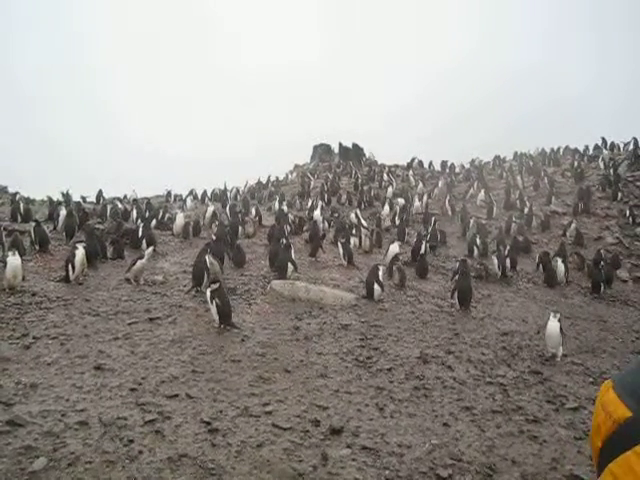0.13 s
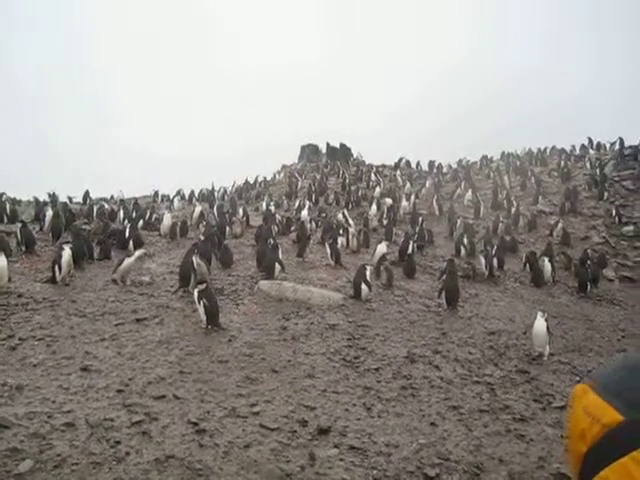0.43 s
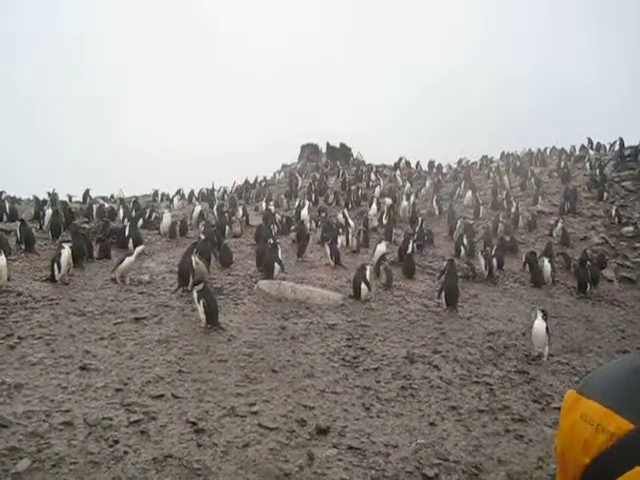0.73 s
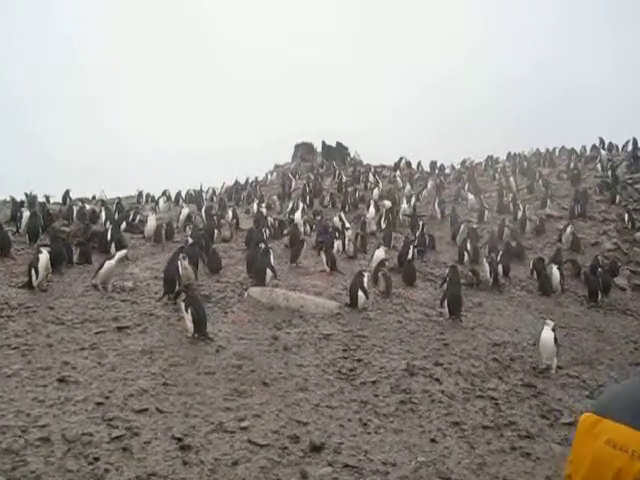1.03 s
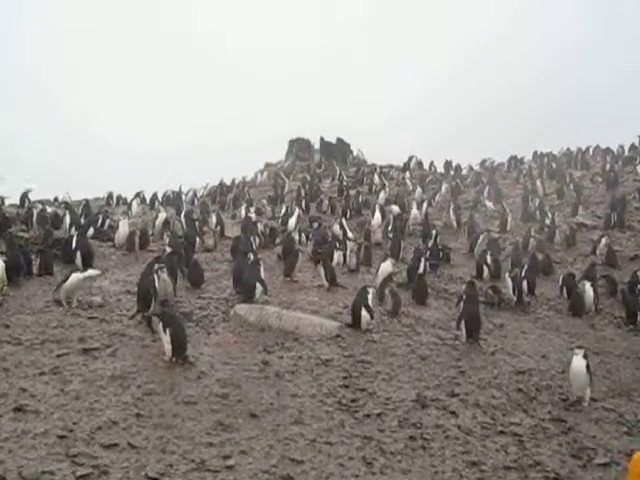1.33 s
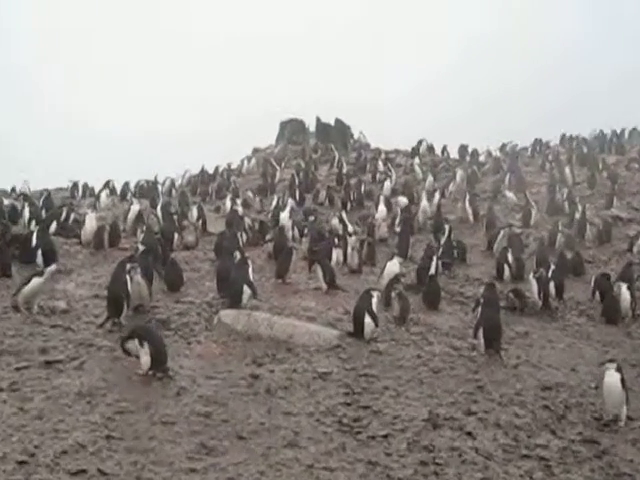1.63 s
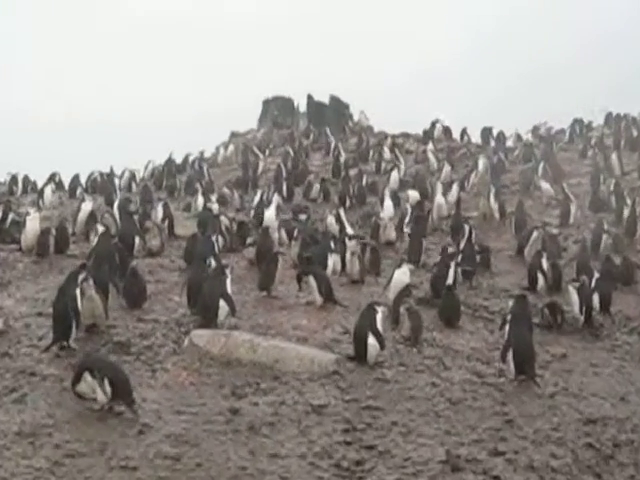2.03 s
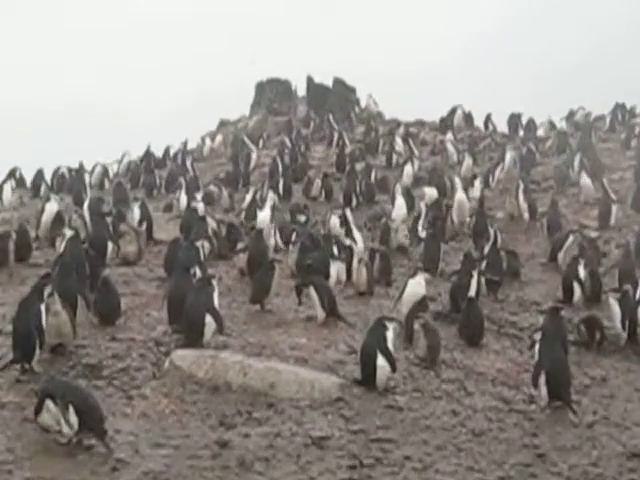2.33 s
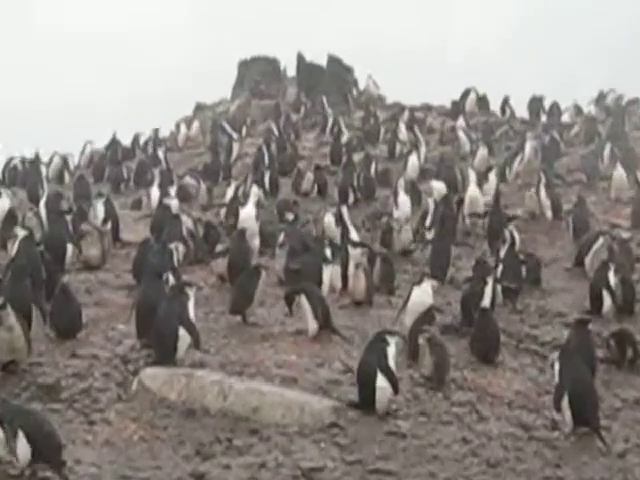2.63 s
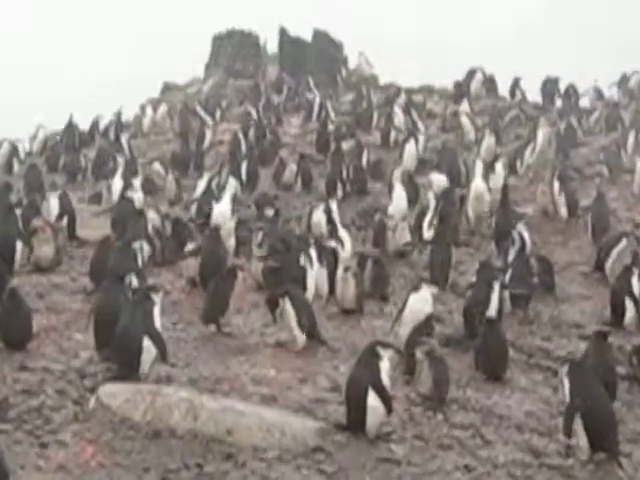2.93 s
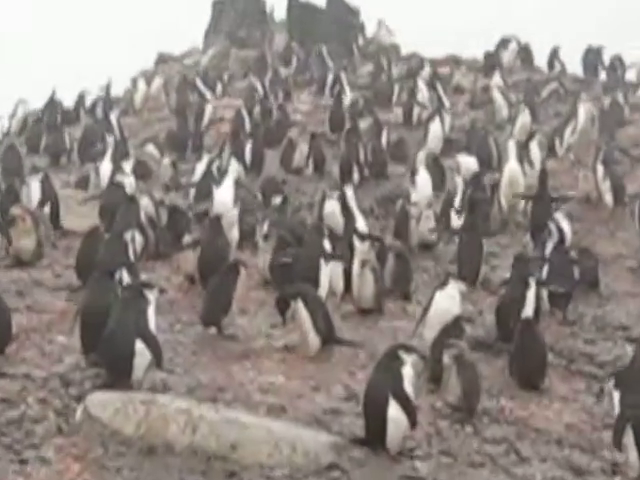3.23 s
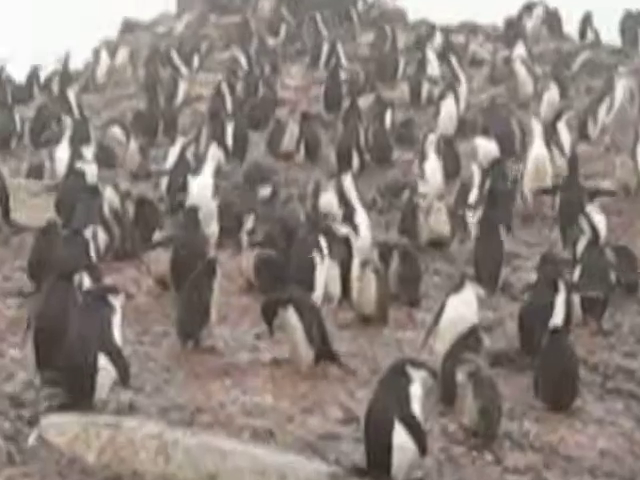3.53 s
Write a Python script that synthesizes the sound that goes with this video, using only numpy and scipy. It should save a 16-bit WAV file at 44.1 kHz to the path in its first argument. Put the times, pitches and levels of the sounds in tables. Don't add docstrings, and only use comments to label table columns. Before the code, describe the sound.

Crowded penguin colony on an open hillside: overlapping raspy barks, rhythmic nasal brays and a few chick peeps above a far din, with lumpy wind rumble strong at first and weaker later.

```python
import sys
import numpy as np
from scipy import signal
from scipy.fft import irfft
from scipy.io import wavfile
from scipy.ndimage import uniform_filter1d

SR = 44100
rng = np.random.default_rng(int(sys.argv[2]) if len(sys.argv) > 2 else 0)


def ratio(d):
    e = np.asarray(d, float) / 20
    return 10 ** e


def generate_wav(signal):
    frames = np.transpose(np.atleast_2d(signal))
    scaled = np.clip(frames, -1, 1) * 32767
    pcm = np.round(scaled).astype(np.int16)
    wavfile.write(sys.argv[1], SR, pcm)


N = 162729


def evened(x):
    return x / np.sqrt(np.mean(x ** 2) + 1e-20)


def add(mix, s, sound):
    at = round(s * SR)
    sound = sound[max(-at, 0):]
    part = mix[max(at, 0):][:len(sound)]
    part += sound[:len(part)]


def curve(points):
    return np.interp(np.arange(N) / SR, *np.transpose(points))


def smooth_wander(shape, size):
    return evened(uniform_filter1d(uniform_filter1d(rng.standard_normal(shape), size=size), size=size))


def colour(x, points):
    hz = np.fft.rfftfreq(4096, 1 / SR) + 1
    f, db = np.transpose(points)
    octaves_below = np.maximum(np.log2(f[0] / hz), 0)
    gain = ratio(np.interp(np.log(hz), np.log(f), db) - 18 * octaves_below)
    taps = np.roll(irfft(gain), 2048) * np.hanning(4096)
    return signal.oaconvolve(x, taps / np.linalg.norm(taps), "same")


def band(x, order, low_hz, high_hz):
    return signal.sosfilt(signal.butter(order, [low_hz, high_hz], "band", fs=SR, output="sos"), x)


def tail(t60):
    taps = np.zeros(SR // 2)
    at = np.arange(150, SR // 2 - 30, 22)
    sign = rng.choice([-1., 1.], len(at))
    taps[at + rng.integers(0, 22, len(at))] = sign * ratio(-60 * at / SR / t60)
    return taps / np.linalg.norm(taps)


def patchy(x):
    z = signal.stft(x, nperseg=512)[2]
    field = uniform_filter1d(rng.standard_normal(z.shape), size=14, axis=0)
    field = evened(uniform_filter1d(field, size=7, axis=1))
    return signal.istft(z * ratio(2.6 * field), nperseg=512)[1][:N]


RISE_S, FALL_S, FADE_DB = 0.022, 0.018, -1


def shape(length, rise=RISE_S):
    t = np.arange(0, length + FALL_S, 1 / SR)
    release = np.clip((length + FALL_S - t) / (2 * FALL_S), 0, 1)
    ramp = np.minimum(t / rise, 1) * release
    return t, np.sin(np.pi / 2 * ramp) ** 2 * ratio(FADE_DB * t / length)


JITTER = 0.07


def syllable(length, db, hz, glide, rough, ring=0., order=4, rise=RISE_S):
    t, env = shape(length, rise)
    noise = np.random.default_rng(rng.integers(1 << 30)).standard_normal((2, len(t)))
    f = hz * (1 + glide * t) * (1 + JITTER * rough * evened(uniform_filter1d(noise[0], size=200)))
    turns = np.cumsum(f) / SR + rng.random()
    top = int(15000 / hz) + .5
    pulses = evened(np.sin(2 * np.pi * top * turns) / (np.sin(np.pi * turns) + 1e-9) - 1)
    phase = 2 * np.pi * order * turns
    ringing = 2 * np.cos(phase) + .6 * np.cos(2 * phase)
    unsteady = 1 + rough * evened(uniform_filter1d(noise[1], size=120))
    pulses = pulses + ring * np.sqrt(hz / 15000) * ringing * unsteady
    puffs = (0.067 + np.exp(-(turns % 1) / 0.24)) * noise[1]
    return ratio(db) * env * evened((1 - rough) * pulses + rough * evened(puffs))


# (f/Hz, level/dB)
AIR = [(3000, -11), (5500, -3.5), (6900, -10.5), (9000, -8), (11000, -22.5), (14500, -28), (15700, -38)]


def air():
    flicker_db = 2.5 * smooth_wander(N, 1500)
    return ratio(-57 + flicker_db) * patchy(colour(rng.standard_normal(N), AIR))


# (t/s, level/dB)
GUST = [(0, -28.5), (.3, -29.5), (.42, -21.5), (.6, -21.5), (.95, -22.5), (1.12, -23.5), (1.45, -30),
        (1.65, -32.5), (1.88, -18.5), (2.0, -27), (2.12, -32.5), (2.26, -45), (2.36, -33.5), (2.6, -34),
        (2.75, -43.5), (3.05, -38), (3.22, -39.5), (3.69, -39)]
# (f/Hz, level/dB)
RUMBLE = [(8.8, -48), (15, 6), (55, 0), (170, -0.5), (375, -9.5), (510, -16.5), (1060, -30), (1600, -48),
          (3300, -100)]


def gusts():
    lump_db, lumps_per_s, flicker_db, calm_db = 3, 320, 3.5, -2
    size = ratio(lump_db * np.minimum(rng.exponential(1, N), 5))
    lumps = size * (rng.random(N) < lumps_per_s / SR) * rng.choice([-1., 1.], N)
    flicker = smooth_wander(N, 900)
    rumble = evened(colour(evened(lumps) + 1.1 * rng.standard_normal(N), RUMBLE))
    return ratio(curve(GUST) + calm_db + flicker_db * flicker) * rumble


# (t/s, peak level/dB, f/Hz)
BUFFETS = [(0.018, -17.5, 169), (0.212, -9, 96), (0.246, -10, 165), (.385, -15.5, 176), (0.55, -11.5, 135),
           (0.656, -15.5, 200), (.85, -38, 70), (.872, -22, 80), (.925, -16, 120), (0.986, -13, 90),
           (1.545, -22.5, 59.5), (1.626, -23, 70), (2.02, -14, 260), (2.31, -26, 85.4), (2.599, -25, 50.4),
           (2.729, -33.5, 49), (0.705, -8.5, 121), (0.728, -11.5, 338), (0.779, -11.5, 97),
           (1.006, -7.5, 145), (1.065, -13, 270), (1.217, -4.5, 99), (1.239, -7, 171), (1.261, -13, 250),
           (1.324, -8, 475), (1.75, -10.5, 83), (1.811, -9.5, 119), (1.828, -5, 69.6), (2.011, -7.5, 97),
           (2.196, -24.5, 92), (2.478, -21, 133), (2.661, -16.5, 110), (2.797, -18.5, 58),
           (2.904, -17, 187), (3.093, -12.5, 220), (3.328, -24.5, 131), (3.435, -27, 141)]


def buffets():
    cycles, puff_db, puff_s = 1.37, -11.5, 0.0058
    out, t = np.zeros(N), np.arange(2600) / SR
    puff = colour(rng.standard_normal(N) ** 3, [(150, 3), (330, -0.5), (900, -13.5), (3000, -61)])
    puff = evened(puff)
    puff_env = ratio(puff_db) * t / puff_s * np.exp(1 - t / puff_s)
    for (s, db, hz), side in zip(BUFFETS, rng.choice([-1., 1.], 60)):
        window = np.sin(np.pi * np.minimum(t * hz / cycles, 1)) ** 2
        swing = side * np.sin(2 * np.pi * hz * t) * window
        add(out, s - .003, ratio(db) * (swing + puff[round(s * SR):][:2600] * puff_env))
    return out


SAG_PER_S, CLIMB_PER_S = -2.3, 3.2
# (f/Hz, level/dB)
DIN = [(350, -66), (700, -11), (1200, -9.5), (1650, 2.5), (2200, -1.5), (5300, -17), (7200, -39),
       (15600, -72)]
# (t/s, level/dB)
DIN_LEVEL = [(0, -26), (.3, -31), (.5, -31), (.8, -34.5), (1.15, -31.5), (1.5, -31), (1.7, -36), (1.9, -31),
             (2.1, -36), (2.4, -32), (2.7, -30.5), (3.0, -29.5), (3.4, -31.5), (3.69, -25)]


def din():
    calls, spread_db, rough, ring = 230, 3.5, .1, .5
    out = np.zeros(N)
    for k, (a, b, c, d, e) in enumerate(rng.random((calls, 5))):
        glide = (SAG_PER_S if d > .4 else CLIMB_PER_S) * (.7 + .7 * e)
        db = -spread_db * np.log(e * 0.74 + 0.13)
        sound = syllable(0.056 + .05 * b, db, 380 + 300 * c, glide, rough, ring, order=3 + k % 3)
        add(out, (k + a) * N / SR / calls - .03, sound)
    far = out + .6 * signal.oaconvolve(out, tail(0.3))[:N]
    return ratio(curve(DIN_LEVEL)) * evened(colour(far, DIN))


# (t/s, peak level/dB, f/Hz)
TICKS = [
    (.9206, -23, 4200),
    (1.068, -44, 11000),
    (1.168, -41, 13000),
    (1.257, -43, 10000),
    (2.9058, -39, 10000),
]


def ticks():
    out, t = np.zeros(N), np.arange(300) / SR
    for s, db, hz in TICKS:
        ringing = np.sin(2 * np.pi * hz * t) + 0.16 * rng.standard_normal(300)
        add(out, s, ratio(db - 60 * t / 0.0046) * ringing)
    return out


# (t/s, length/s, level/dB, first f/Hz, last f/Hz)
CRIES = [(.17, .06, -36, 1350, 1750), (.235, .035, -35, 1750, 1300), (.385, .045, -36, 2800, 2800),
         (.61, .05, -36, 4100, 3400), (.615, .04, -39, 5200, 4300), (.8, .03, -35, 1350, 1600),
         (.858, .025, -32, 1560, 1400), (.868, .015, -33, 2750, 2720), (.9, .02, -34, 1620, 1520),
         (.96, .03, -33, 1680, 1620), (1.085, .05, -34, 1780, 1600), (1.16, .055, -31, 1790, 2200),
         (1.222, .055, -30, 1900, 1550), (1.222, .03, -33, 2350, 2150), (2.69, .02, -33, 2350, 2400),
         (2.74, .05, -35, 3420, 3150), (2.8, .07, -35, 1920, 1800), (2.886, .018, -26, 1750, 1650),
         (2.89, .05, -32, 2150, 1900), (2.91, .045, -32, 2420, 2330), (3.125, .02, -32, 1620, 1560),
         (3.165, .02, -33, 1720, 1640), (3.19, .055, -30, 2200, 2350), (3.25, .045, -32, 1800, 1650),
         (3.47, .05, -33, 2850, 2550), (3.525, .04, -33, 1800, 1620), (3.57, .05, -34, 1400, 1500),
         (3.67, .03, -30, 1950, 1980)]


def cries():
    rise_s, ring, rough, extra_db = .006, 4, .2, 2.5
    out = np.zeros(N)
    for s, length, db, hz, end_hz in CRIES:
        glide = (end_hz / hz - 1) / length
        sound = syllable(length, db + extra_db, hz / 4, glide, rough, ring, rise=rise_s)
        add(out, s - rise_s / 2, sound)
    return band(out, 2, 900, 5000)


# (t/s, length/s, level/dB, first f/Hz, last f/Hz)
COOS = [
    (3.405, 0.075, -37.5, 670, 707),
    (3.62, 0.085, -44, 748, 610),
]


def coos():
    out = np.zeros(N)
    for s, length, db, hz, end_hz in COOS:
        t, env = shape(length)
        waver = evened(uniform_filter1d(rng.standard_normal(6000), size=400))[:len(t)]
        dip = 1 - 0.041 * np.sin(np.pi * t / length) + 0.012 * waver
        f = (hz + (end_hz - hz) * t / length) * dip
        add(out, s, ratio(db) * env * np.sin(2 * np.pi * np.cumsum(f) / SR))
    return out


# (t/s, length/s, level/dB, treble level/dB)
BARKS = [(0.077, 0.067, -32, 2), (0.134, 0.062, -26.5, 0), (0.24, 0.065, -30.5, -6),
         (0.308, 0.19, -32.5, -4), (0.53, 0.16, -27.5, 5.5), (0.695, 0.069, -31.5, 4),
         (.84, 0.2, -29.5, -4), (1.037, 0.072, -30.5, -4), (1.113, 0.062, -35, -2),
         (1.262, 0.17, -34.5, 8.5), (1.438, 0.11, -31.5, -13), (1.549, 0.14, -35.5, 7),
         (1.736, 0.096, -31, 8), (1.813, 0.11, -30.5, -13), (1.886, 0.17, -33, 9), (2.158, 0.067, -31.5, 3),
         (2.224, 0.17, -38, 10), (2.446, 0.15, -33, -1), (2.584, 0.13, -30, -0.5), (2.74, 0.13, -34.5, -1),
         (2.89, 0.11, -34, 10), (3.043, 0.092, -28.5, -1), (3.139, 0.16, -28.5, -8), (3.301, 0.15, -29, 5),
         (3.457, 0.069, -27, -14), (3.552, 0.2, -30.5, 2)]
# (f/Hz, level/dB)
RASP = [(800, -19), (1250, -3.5), (2000, -3.5), (2800, -2), (5300, -10), (7200, -25.5), (10500, -34),
        (15600, -46)]


def barks():
    pitch_hz, treble_hz, rough, ring = 299.6, 8100, .3, .5
    out = np.zeros(N)
    for s, length, db, treble_db in BARKS:
        for late, a, b in rng.random((2, 3)) * [[0, 1, 1], [.3, 1, 1]]:
            glide = SAG_PER_S * (.3 + .7 * b)
            sound = syllable(length * (1 - late), db - 7.0, pitch_hz * (1 + a), glide, rough, ring,
                             order=round(6.5 - 3 * a), rise=RISE_S / 2)
            low = treble_hz * (1 + 0.26 * b)
            edge = band(sound, 1, low, 1.23 * low)
            add(out, s - RISE_S / 2 + late * length, sound + edge * ratio(treble_db))
    return colour(out, RASP)


# (f/Hz, level/dB)
THROAT = [(500, -15), (1100, -6), (1600, 3.5), (2300, 5.5), (3000, 1.5), (5200, -7), (7000, -28),
          (15000, -52)]


def throat(x):
    return colour(x, THROAT)


BRAY_ROUGH = .1
# (t/s, length/s, level/dB, first f/Hz, last f/Hz)
PEEPS = [
    (0.232, 0.045, -29, 1384, 1265),
    (1.721, 0.069, -36, 1462, 1585),
    (2.227, 0.048, -35.5, 1500, 1560),
    (2.445, 0.016, -25, 1446, 1350),
    (3.451, 0.025, -23.5, 1760, 1660),
]


def peeps():
    out = np.zeros(N)
    for s, length, db, hz, end_hz in PEEPS:
        sound = syllable(length, db, hz, (end_hz / hz - 1) / length, BRAY_ROUGH)
        add(out, s - RISE_S / 2, sound)
    return throat(out)


# (t/s, length/s, level/dB, first f/Hz)
CHANT = [(.325, .075, -36, 540), (.59, .08, -27.5, 540), (1.03, .085, -36, 545), (1.29, .1, -36, 555),
         (1.595, .085, -34, 530), (1.865, .06, -35, 550), (2.255, .04, -33, 625), (2.3, .075, -36, 555),
         (2.595, .085, -36, 550), (2.9, .09, -33, 550), (3.19, .1, -32, 570), (3.47, .09, -36, 570)]


def chant():
    sag_per_s, rough, ring = -2.4, .14, 1.2
    out = np.zeros(N)
    for s, length, db, hz in CHANT:
        add(out, s - RISE_S / 2, syllable(length, db, hz, sag_per_s, rough, ring))
    return throat(out)


# (t/s, length/s, level/dB, first f/Hz, last f/Hz)
BRAYS = [(0.0, 0.052, -25.5, 505, 407), (0.752, 0.094, -32.5, 414.4, 499.6), (0.845, 0.06, -35, 578, 534),
         (1.158, 0.06, -28, 447, 550), (1.218, .058, -32.5, 475, 388), (1.57, 0.033, -31, 503, 489),
         (1.906, 0.13, -36, 633, 552), (2.458, .06, -34, 470, 401), (2.735, 0.055, -29, 490, 468),
         (3.571, 0.068, -30, 461, 506), (3.632, 0.06, -31, 520, 458.5)]


def brays():
    out = np.zeros(N)
    for s, length, db, hz, end_hz in BRAYS:
        sound = syllable(length, db, hz, (end_hz / hz - 1) / length, BRAY_ROUGH)
        if hz < end_hz:
            sound = signal.sosfilt(signal.butter(2, 3320, fs=SR, output="sos"), sound)
        add(out, s - RISE_S / 2, sound)
    return throat(out)


def scene():
    near = brays() + chant() + peeps() + coos() + patchy(barks()) + ticks()
    echoes = ratio(-8) * signal.oaconvolve(near, tail(.1))[:N]
    overload = .5
    wind = overload * np.tanh((gusts() + buffets()) / overload)
    mono = near + echoes + din() + wind + cries() + air()
    return np.array([mono, mono])


def band_limit(x):
    return signal.sosfilt(signal.butter(12, 15720, fs=SR, output="sos"), x)


def record(dry):
    return band_limit(dry)


dry = scene()
out = record(dry)
generate_wav(out)
```